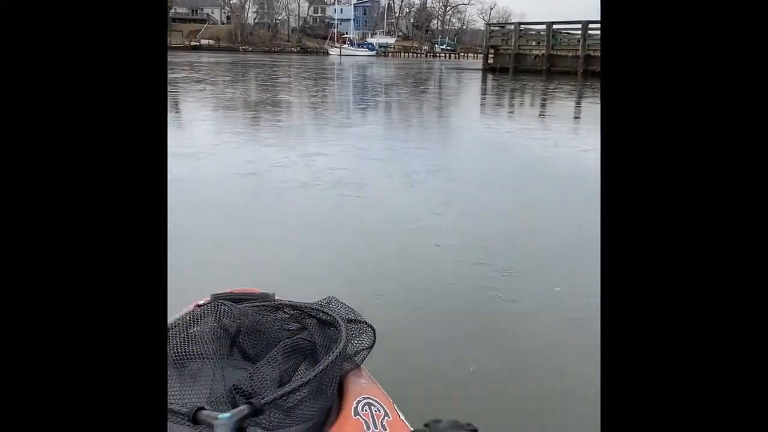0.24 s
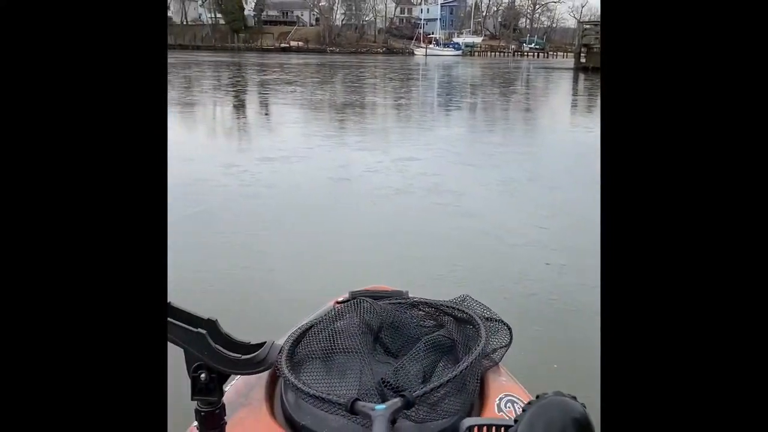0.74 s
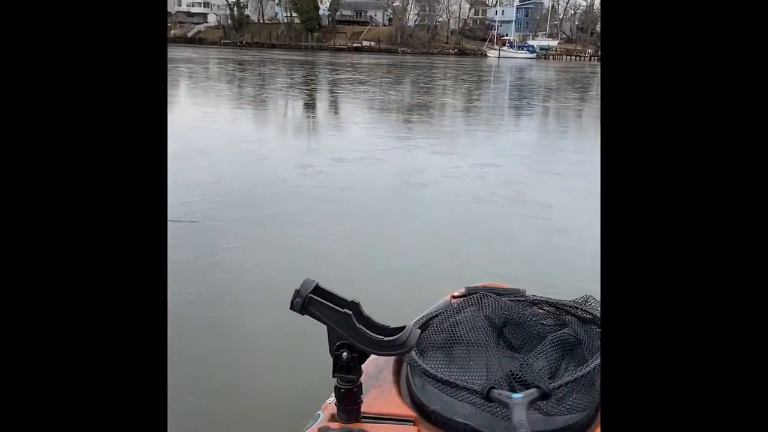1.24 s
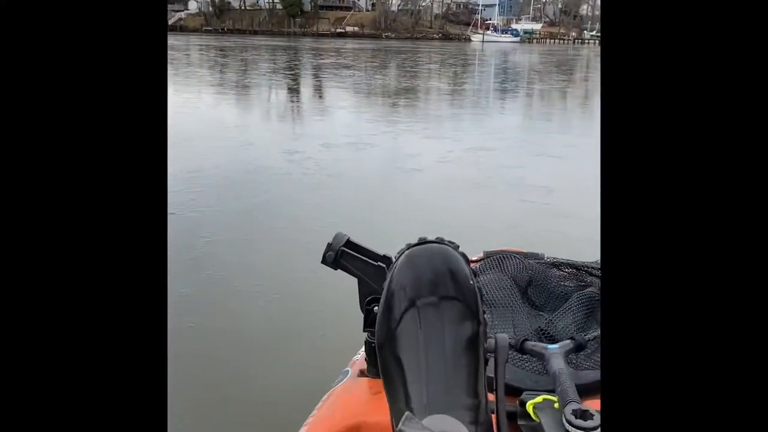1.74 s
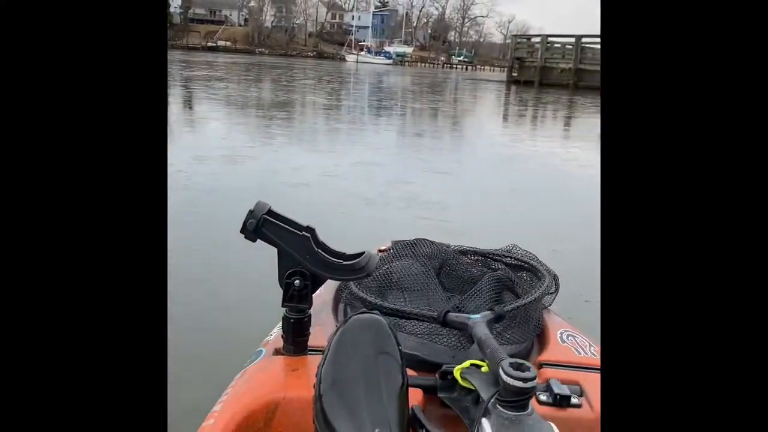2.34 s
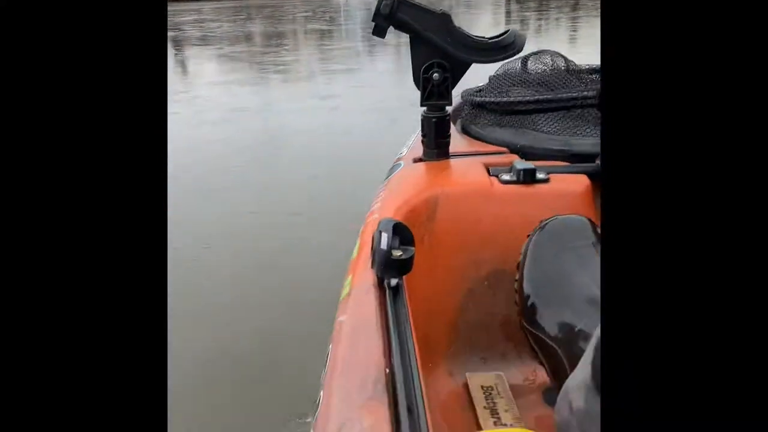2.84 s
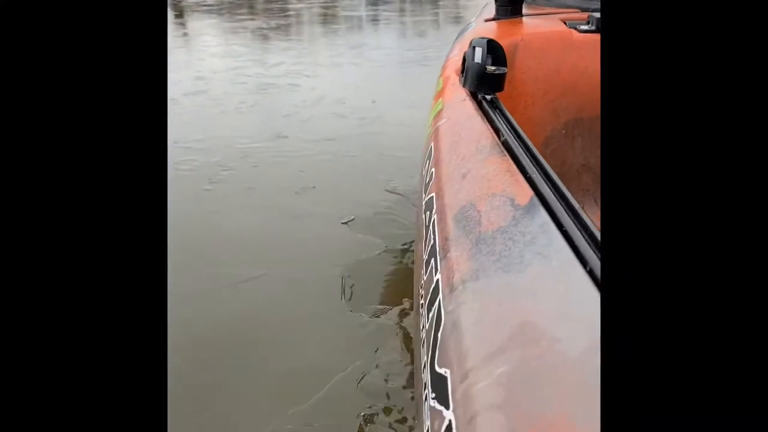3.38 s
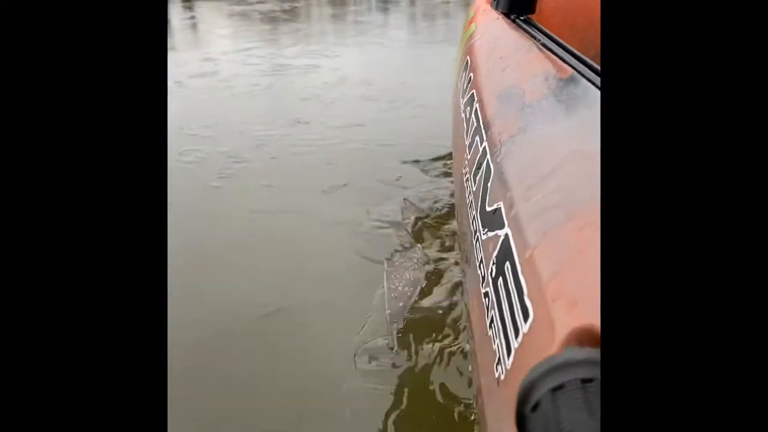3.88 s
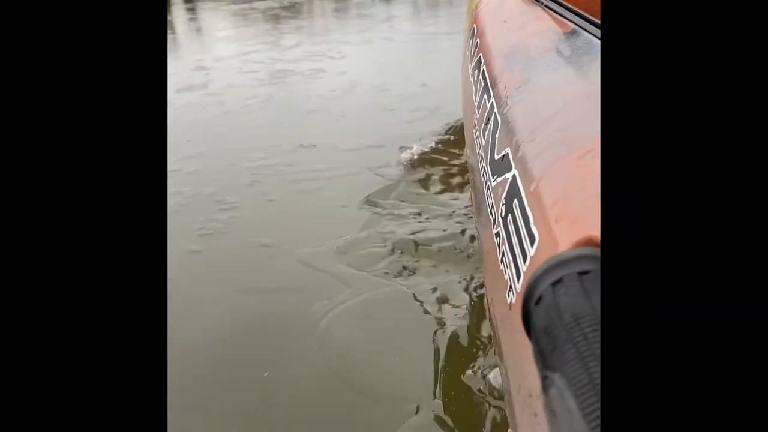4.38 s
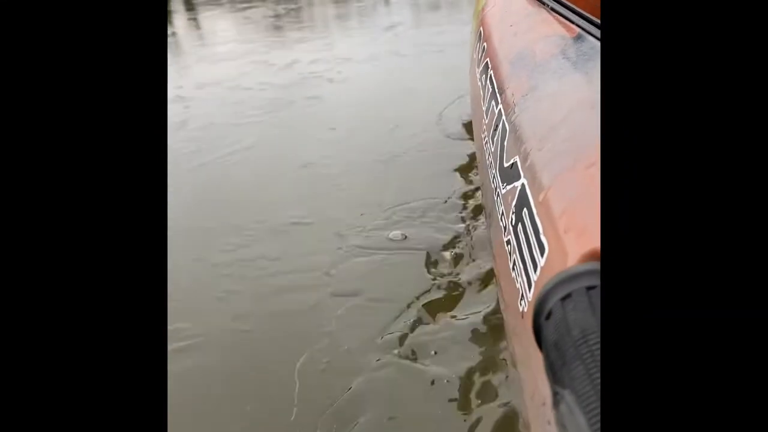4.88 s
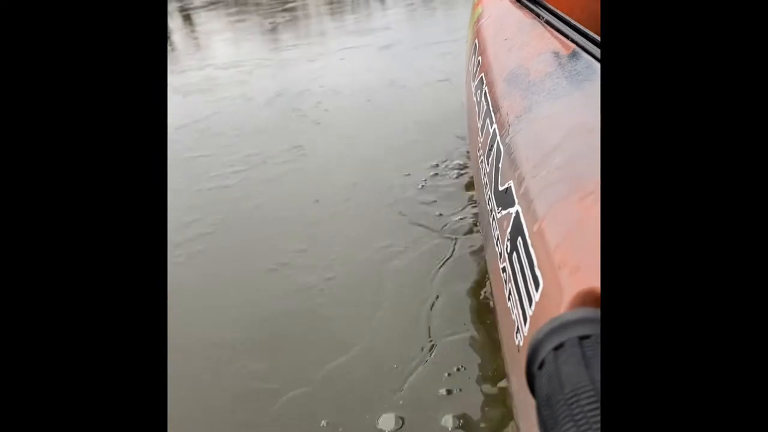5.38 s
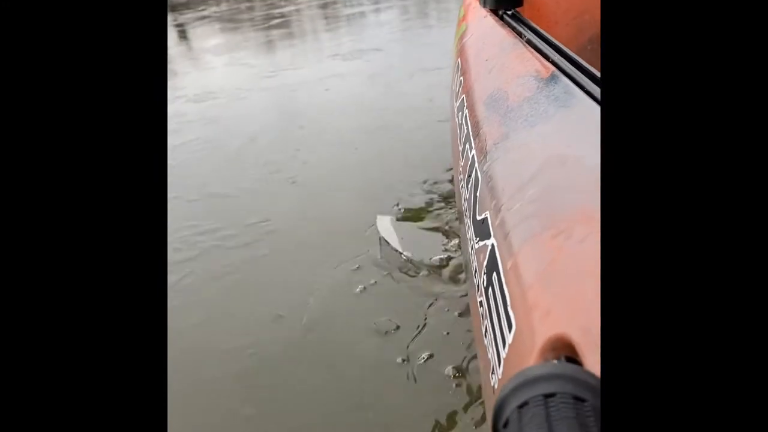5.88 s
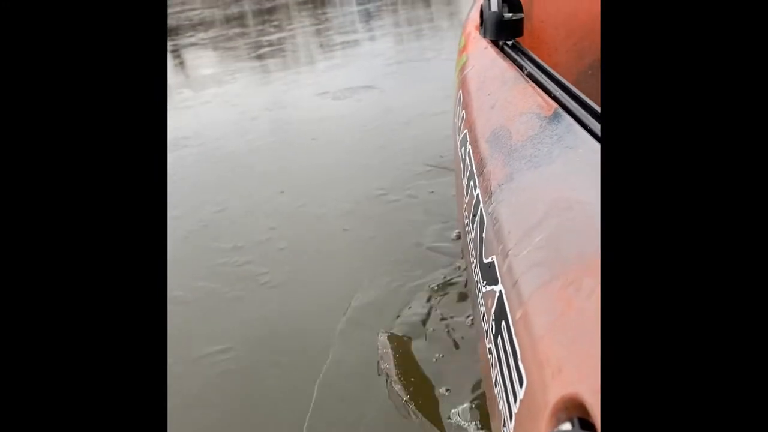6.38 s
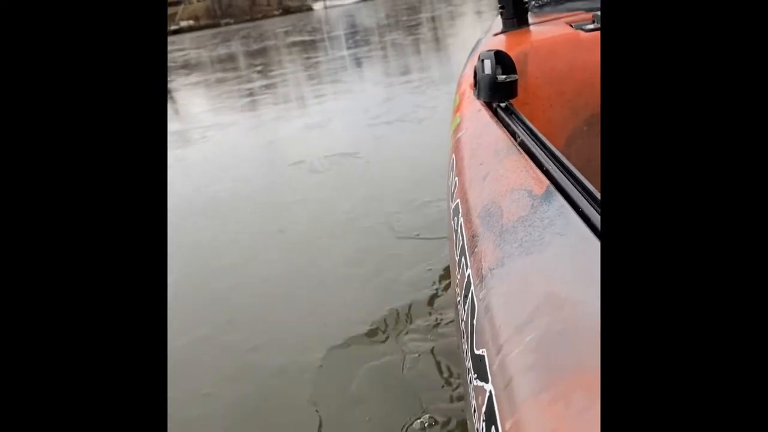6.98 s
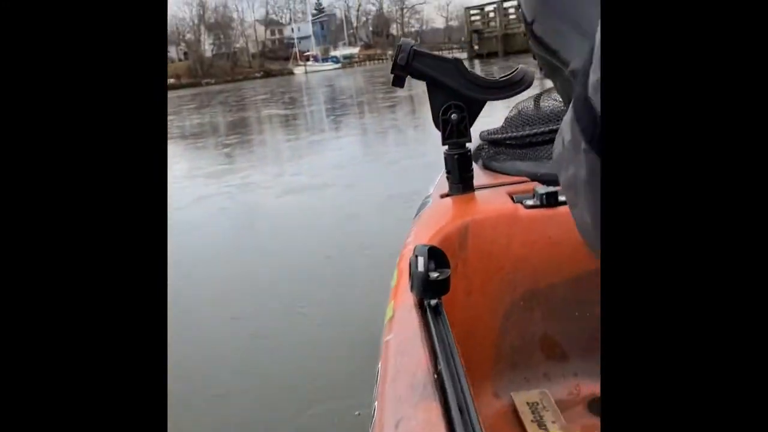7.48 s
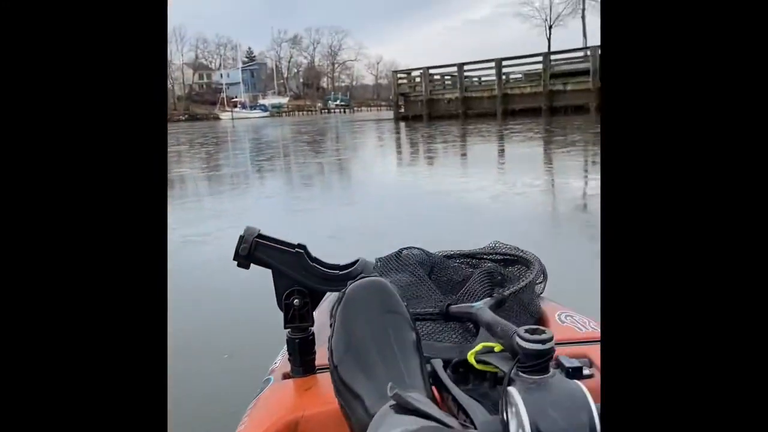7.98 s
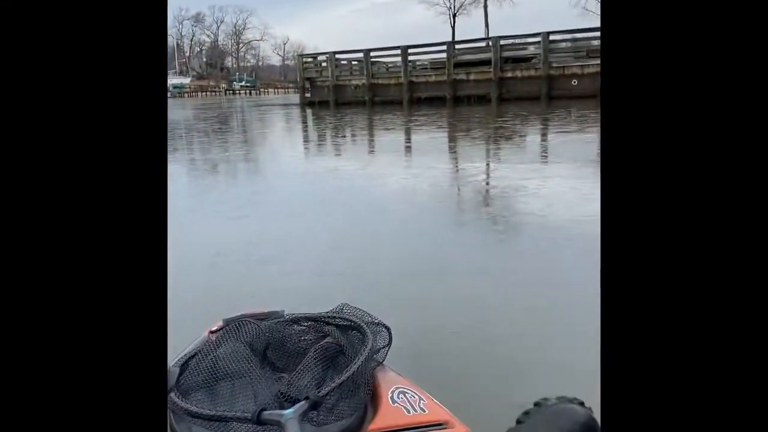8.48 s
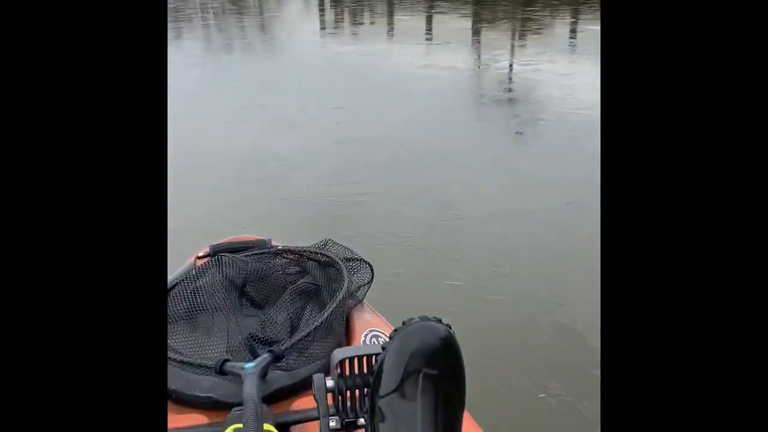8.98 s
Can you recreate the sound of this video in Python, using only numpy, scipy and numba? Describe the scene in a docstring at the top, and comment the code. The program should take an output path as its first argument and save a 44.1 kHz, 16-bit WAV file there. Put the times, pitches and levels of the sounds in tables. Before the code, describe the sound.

Thin river ice cracks and crunches against a hollow plastic kayak hull, with low knocks, grinding drag and brittle glassy snaps, close up outdoors.

```python
"""A plastic kayak is pedalled through new ice on a calm river, heard from a phone held in the seat.
From the start plates crack at the bow, knock on the hollow hull and grind in fits over a steady drag.
From about 2.2 s glassy shard snaps join in, crowding near 3.5 s and again from 4.9 to 5.9 s.
The drag dips near 7.7 s as the boat almost stalls; then cracks crowd in again, with few snaps, to the end.
Breaks are rung click swarms; knocks gliding tones; crunch, fizz and hull drone are dense damped grains."""
import sys
import numpy as np
from scipy import signal
from scipy.fft import rfft, irfft
from scipy.io import wavfile
from scipy.ndimage import uniform_filter1d, map_coordinates
from numba import njit

SR = 44100
rng = np.random.default_rng(int(sys.argv[2]) if len(sys.argv) > 2 else 0)


def digitize_waveform(pressure):
    """Quantize a signal to 16-bit integers and store it at the path in sys.argv[1].

    Rows of a 2-D input are taken as channels; values are limited to [-1, 1].
    """
    field = np.atleast_2d(pressure).T
    bounded = np.clip(field, -1, 1)
    quanta = np.round(bounded * 32767).astype(np.int16)
    wavfile.write(sys.argv[1], SR, quanta)


N = 407043  # samples

# Event and effort levels are those before each layer's gain_db; peak_s is the approximate climax.
# plates breaking at the bow: peak_s, level_db, length_s, pitch_hz, shard_re_plate_db, shard_pitch_hz
PLATE_CRACKS = [(0.4405, -21.5, 0.009, 1220, -8, 3120), (0.679, -24.5, 0.011, 1900, 0, 2670),
                (0.7083, -18.5, 0.0033, 1220, -8, 3430), (0.8544, -22, 0.011, 900, -6, 5840),
                (0.8945, -21, 0.0059, 1220, -14, 2020), (0.9819, -23, 0.017, 890, -9, 3700),
                (1.164, -21.5, 0.0037, 1980, -3, 3480), (1.2898, -23, 0.012, 980, -5, 2090),
                (1.3113, -18.5, 0.0033, 1360, -2, 3220), (1.3444, -22.5, 0.0097, 945, -19, 1910),
                (1.4487, -24, 0.013, 1300, -2, 2300), (1.4895, -20.5, 0.012, 1180, -4, 1920),
                (1.5863, -21.5, 0.013, 930, -3, 3270), (1.6526, -17, 0.0022, 2240, -14, 3830),
                (1.742, -19.5, 0.016, 850, -8, 3500), (1.8537, -16.5, 0.019, 1250, -5, 2090),
                (1.944, -21.5, 0.014, 850, -9, 5600), (2.0466, -22.5, 0.013, 1195, -2, 4430),
                (2.2649, -21, 0.0055, 850, -1, 4800), (2.4187, -23.5, 0.014, 1110, -5, 2830),
                (2.5274, -19, 0.019, 1140, -3.5, 3400), (2.648, -14, 0.0012, 830, -18, 3140),
                (2.7234, -25, 0.016, 850, -4, 5530), (2.909, -24, 0.0093, 870, -20, 2300),
                (2.921, -7.5, 0.00167, 1480, -6, 2100), (2.977, -24, 0.0032, 1700, -15, 5500),
                (3.1715, -20.5, 0.018, 834, -16, 2400), (3.2461, -21, 0.013, 1060, -6, 5750),
                (3.3393, -20.5, 0.013, 960, -1, 5400), (3.3687, -15, 0.004, 840, -1, 4250),
                (3.3841, -13.5, 0.0023, 3700, 0.0, 5300), (3.413, -12.5, 0.0022, 1620, 3, 2800),
                (3.467, -21, 0.0076, 900, -7, 5700), (3.5558, -18, 0.0055, 1200, -25, 1910),
                (3.5969, -18, 0.0091, 865, -8, 2510), (3.6898, -18, 0.0025, 860, 0.0, 4800),
                (3.7552, -14.5, 0.0035, 860, -10, 5300), (3.7735, -13.5, 0.0053, 860, -8, 4270),
                (3.8334, -16, 0.0016, 2380, -7, 3140), (3.8493, -20, 0.016, 955, -1, 5700),
                (3.8748, -21, 0.014, 895, -12.0, 3000), (4.126, -25, 0.003, 1090, -13, 2400),
                (4.1825, -18.5, 0.014, 1050, -22, 2550), (4.533, -16, 0.0061, 1084, -4, 2570),
                (4.703, -35, 0.0026, 1000, -4, 2720), (4.9812, -17.5, 0.0042, 1300, -6, 5770),
                (5.057, -12, 0.0026, 835, -1, 3000), (5.0953, -18, 0.0029, 860, 3, 5900),
                (5.1693, -25, 0.01, 860, 6, 4900), (5.2201, -19, 0.0031, 890, -3.0, 4300),
                (5.4462, -18, 0.013, 830, -16, 2560), (5.5635, -18.5, 0.0074, 860, -8, 5770),
                (5.6271, -20.5, 0.015, 840, -16, 4680), (5.819, -23, 0.0032, 840, -4, 5760),
                (5.946, -21.5, 0.005, 1500, -3, 2520), (6.473, -23, 0.0039, 2800, 5, 4830),
                (6.5074, -19.5, 0.0089, 880, -5, 2640), (6.833, -24, 0.012, 1100, -3, 2230),
                (7.3661, -21, 0.0076, 1050, -14, 4300), (7.534, -28, 0.0024, 1520, -14, 4530),
                (7.7494, -19.5, 0.005, 940, -5, 4040), (7.8117, -22, 0.01, 1250, -6, 3570),
                (7.8875, -22, 0.012, 920, -5, 5740), (7.9033, -17.5, 0.0028, 2190, -4, 3030),
                (8.009, -22.5, 0.0079, 1500, 5, 2080), (8.037, -25, 0.0019, 1220, -10, 2200),
                (8.0798, -14.5, 0.0015, 1550, -10, 2080), (8.0928, -22.5, 0.013, 1150, -12.0, 2200),
                (8.2014, -17.5, 0.0073, 970, -20, 2050), (8.243, -20, 0.0024, 1100, -4, 2000),
                (8.2566, -17, 0.008, 860, -12, 2960), (8.3233, -14, 0.0017, 1700, -11, 3760),
                (8.3621, -15, 0.0045, 1030, -16, 1920), (8.4662, -24.5, 0.0051, 1230, 6, 2170),
                (8.484, -27, 0.0023, 1100, -12, 2330), (8.533, -22.5, 0.0097, 1770, -2, 4860),
                (8.6866, -19, 0.013, 960, -5.5, 3720), (8.7379, -19, 0.0062, 1040, -8, 2720),
                (8.7719, -20.5, 0.0081, 1200, -18, 2420), (9.0027, -19.5, 0.012, 1133, -4, 3980),
                (9.133, -14, 0.0065, 1120, -21, 1870)]
# plates and water bumping the hollow hull: peak_s, level_db, length_s, pitch_hz
HULL_KNOCKS = [(0.17, -17.5, 0.009, 464), (0.199, -10, 0.014, 209), (0.304, -10, 0.0069, 345),
               (0.34, -24, 0.006, 656), (0.428, -12, 0.013, 194), (0.603, -11, 0.0072, 187),
               (0.689, -13, 0.0081, 329), (0.824, -13, 0.0049, 470), (0.873, -20, 0.0045, 640),
               (0.877, -9.5, 0.0052, 338), (1.005, -14, 0.0109, 210), (1.207, -17, 0.018, 360),
               (1.221, -19, 0.0025, 610), (1.226, -8.5, 0.0033, 436), (1.314, -12.5, 0.014, 301),
               (1.338, -12, 0.006, 390), (1.424, -12.5, 0.012, 443), (1.449, -13.5, 0.014, 353),
               (1.447, -23, 0.0065, 570), (1.553, -19, 0.01, 459), (1.701, -22, 0.01, 488),
               (1.885, -14, 0.0094, 460), (1.571, -13, 0.0065, 360), (1.581, -11.5, 0.012, 168),
               (1.704, -18, 0.029, 347), (1.731, -21, 0.014, 143), (1.871, -7.5, 0.0037, 328),
               (2.159, -14.5, 0.0066, 357), (2.388, -16, 0.025, 352), (2.479, -14, 0.0093, 266),
               (2.524, -15, 0.0058, 378), (2.617, -13, 0.012, 350), (2.749, -12, 0.011, 210),
               (2.885, -12, 0.0045, 480), (2.924, -25, 0.0046, 560), (3.056, -9.5, 0.0058, 253),
               (3.058, -13.5, 0.016, 144), (3.141, -10, 0.0075, 286), (3.178, -15, 0.012, 430),
               (3.252, -21, 0.0059, 574), (3.348, -12.5, 0.0077, 335), (3.402, -13, 0.016, 91),
               (3.426, -8, 0.0069, 270), (3.431, -14, 0.0083, 510), (3.552, -18, 0.0089, 174),
               (3.593, -16, 0.015, 88), (3.654, -11, 0.0074, 220), (3.784, -15, 0.013, 141),
               (3.787, -20, 0.018, 254), (3.792, -12, 0.006, 710), (3.795, -12, 0.007, 402),
               (3.805, -8, 0.0052, 265), (3.817, -10.5, 0.018, 87), (3.842, -13, 0.0083, 256),
               (3.866, -14, 0.0061, 680), (3.866, -12, 0.0164, 98), (3.884, -19, 0.0129, 338),
               (4.178, -14, 0.016, 166), (4.276, -11.5, 0.0058, 274), (4.429, -9.5, 0.0067, 280),
               (4.535, -9.5, 0.0072, 233), (4.561, -16.5, 0.0053, 343), (4.622, -24, 0.0079, 632),
               (4.706, -14, 0.0032, 600), (4.709, -12, 0.0061, 283), (4.749, -14.5, 0.017, 289),
               (4.792, -8, 0.0074, 173), (5.056, -15, 0.0042, 637), (5.063, -17, 0.015, 310),
               (5.115, -11.5, 0.013, 103), (5.135, -18, 0.0086, 176), (5.224, -17, 0.0095, 296),
               (5.476, -12, 0.0065, 294), (5.586, -14.5, 0.032, 98), (5.636, -12.5, 0.015, 174),
               (5.795, -11.5, 0.0053, 250), (5.953, -20.5, 0.018, 88), (5.965, -13.5, 0.018, 341),
               (5.995, -17.5, 0.008, 743), (6.096, -13.5, 0.0069, 281), (6.15, -13, 0.01, 180),
               (6.358, -11.5, 0.013, 156), (6.392, -13.5, 0.025, 174), (6.454, -17, 0.0086, 402),
               (6.51, -16, 0.007, 560), (6.608, -15, 0.025, 222), (6.735, -17.5, 0.0058, 350),
               (6.832, -15, 0.0064, 440), (6.918, -9, 0.0073, 181), (7.157, -20, 0.025, 280),
               (7.172, -21, 0.0062, 580), (7.175, -17, 0.0093, 186), (7.211, -13.5, 0.009, 190),
               (7.214, -9, 0.0054, 340), (7.35, -17, 0.0085, 345), (7.364, -13, 0.011, 170),
               (7.596, -17, 0.0096, 242), (7.84, -12.5, 0.0077, 206), (7.895, -19, 0.007, 650),
               (7.924, -14, 0.018, 327), (8.099, -11, 0.0042, 454), (8.216, -18.5, 0.0065, 527),
               (8.499, -23, 0.0069, 700), (8.359, -15, 0.014, 200), (8.69, -14.5, 0.006, 723),
               (8.699, -13, 0.0057, 294), (8.764, -15, 0.012, 196), (9.0, -17.5, 0.015, 293),
               (9.148, -15, 0.011, 212)]
# brittle snaps of thin shards: peak_s, level_db, pitch_hz
SHARD_SNAPS = [(0.134, -20.5, 12100), (0.832, -21, 10600), (1.941, -22, 8040), (2.04, -23, 9290),
               (2.263, -14, 9700), (2.35, -19, 6650), (2.584, -16.5, 12800), (2.719, -14, 10600),
               (2.919, -11.5, 11500), (2.976, -21, 7850), (3.003, -16.5, 8600), (3.245, -18.5, 7840),
               (3.283, -16.5, 8750), (3.381, -13.5, 8800), (3.441, -16, 13400), (3.466, -10, 9000),
               (3.528, -18, 8200), (3.609, -23, 9700), (3.664, -15, 8340), (3.689, -14, 11700),
               (3.788, -13.5, 9100), (3.808, -21, 11900), (3.85, -14.5, 10000), (4.079, -22, 9700),
               (4.322, -23, 8800), (4.944, -13.5, 9000), (4.972, -20, 10300), (4.977, -13.5, 9200),
               (4.995, -21, 7650), (5.055, -21, 7140), (5.095, -10.5, 8950), (5.138, -18.5, 11400),
               (5.217, -18, 12310), (5.561, -5, 11700), (5.651, -18, 10600), (5.662, -16, 12800),
               (5.719, -20.5, 8300), (5.727, -18, 11000), (5.766, -23, 9100), (5.818, -9, 10800),
               (5.867, -20, 11200), (6.154, -24, 12300), (6.48, -14, 10400), (6.587, -22.5, 9800),
               (6.9, -22, 12700), (7.115, -20, 8500), (7.359, -16.5, 9750), (7.533, -18.5, 12200),
               (8.696, -21, 11700)]
# broken edges scraping over the sheet: peak_s, level_db, length_s, pitch_hz
EDGE_SCRAPES = [(0.463, -33, .02, 1120), (0.654, -37.5, 0.0081, 3620), (1.278, -36, 0.01, 3040),
                (1.335, -29, .016, 1550), (1.479, -33, 0.013, 3730), (2.824, -32, 0.015, 2410),
                (2.86, -33, .014, 4360), (3.047, -21.5, .01, 1190), (3.191, -37, 0.016, 2930),
                (3.306, -21, 0.0062, 1200), (3.839, -28.5, .022, 3400), (4.525, -24, .01, 2600),
                (4.726, -33, 0.024, 3300), (4.761, -34, .05, 895), (5.44, -33, 0.016, 2560),
                (5.982, -35, 0.047, 1000), (6.507, -31.5, 0.01, 2920), (8.343, -30, 0.03, 1750),
                (8.465, -27, .008, 2100), (8.522, -25, 0.0067, 2100)]
# modes of a loose ice plate: pitch_ratio, level_db
PLATE_MODES = [(.78, -10.5), (1, 3.5), (1.36, 0), (1.9, -8.5)]
# colour of crushed ice: freq_hz, gain_db
CRUNCH_COLOUR = [(200, -34), (400, -2.5), (600, -1.5), (1000, -0.5), (1400, -4), (1800, -8), (2600, -7.5),
                 (4500, -12.5), (8000, -11.5), (16000, -106)]
# colour of sliding splinters: freq_hz, gain_db
SPLINTER_COLOUR = [(1500, -25), (3500, -8), (6000, -3), (8300, 3.5), (10500, -6), (12800, 6.5), (16000, -2)]
# hull resonances: freq_hz, width_hz, level_db
HULL_MODES = [(87.8, 53, -1.5), (144, 42, -0.5), (177.7, 40, 0), (224.3, 45, -1.5), (288.3, 50, -2),
              (351.8, 36.4, -2.5), (477, 127, -5)]
# hull wall boom, fullest while the phone leans out over the side: time_s, lowest_mode_lift_db
LEAN_LIFT = [(0, 2), (1.3, -5), (2.1, 2), (3.7, 0), (4.3, 1), (6.7, 3), (7.7, -2)]
# fits in which the sheet gives way: start_s, length_s, hull_level_db, crumbs_level_db, splinters_level_db
SHEET_SHOVES = [(-0.004, 0.097, -30.5, -40, -39), (0.176, 0.053, -30.5, -37, -44),
                (0.284, 0.086, -26, -30.5, -47.5), (0.375, 0.149, -26.5, -30.5, -50),
                (0.611, 0.041, -28.5, -30, -40.5), (0.69, 0.05, -19.5, -30.5, -45.5),
                (0.775, 0.02, -26, -34, -44), (0.81, 0.107, -24, -29.5, -44),
                (0.938, 0.086, -20.5, -35, -48), (1.157, 0.087, -23, -29, -47.5),
                (1.273, 0.091, -17.5, -30, -50.5), (1.423, 0.077, -20.5, -24.5, -49.5),
                (1.545, 0.079, -20, -31, -52), (1.673, 0.074, -18.5, -29, -44.5),
                (1.809, 0.131, -23.5, -33, -49), (1.962, 0.105, -23.5, -30.5, -43),
                (2.124, 0.041, -19.5, -35.5, -47.5), (2.198, 0.12, -22, -30.5, -39),
                (2.32, 0.142, -20, -32.5, -40), (2.484, 0.04, -19, -28, -40.5),
                (2.572, 0.094, -21.5, -26, -44.5), (2.698, 0.076, -20, -24.5, -45.5),
                (2.771, 0.069, -21.5, -33, -43), (2.847, 0.066, -23.5, -25.5, -46),
                (2.991, 0.059, -20, -23.5, -44), (3.101, 0.099, -18.5, -24, -48.5),
                (3.224, 0.092, -24.5, -27.5, -39), (3.312, 0.187, -20.5, -26, -38.5),
                (3.498, 0.079, -15, -35.5, -45.5), (3.651, 0.038, -29, -28.5, -41),
                (3.715, 0.17, -17.5, -25, -44), (4.006, 0.038, -27, -30.5, -30),
                (4.107, 0.087, -19, -25.5, -46), (4.219, 0.134, -24, -31.5, -51),
                (4.396, 0.088, -24.5, -31, -47), (4.47, 0.107, -20.5, -34, -48.5),
                (4.601, 0.083, -25.5, -27, -46.5), (4.689, 0.114, -19.5, -24.5, -44),
                (4.864, 0.026, -28, -25, -44.5), (4.973, 0.183, -23, -29.5, -41.5),
                (5.157, 0.08, -25.5, -27.5, -37.5), (5.3, 0.036, -24, -30, -44),
                (5.421, 0.111, -24, -28.5, -49), (5.55, 0.155, -24, -28, -44),
                (5.732, 0.176, -25, -32.5, -34.5), (5.949, 0.106, -25, -27.5, -48.5),
                (6.07, 0.183, -23.5, -28, -52.5), (6.327, 0.124, -22, -31.5, -37),
                (6.461, 0.095, -20.5, -27.5, -43.5), (6.575, 0.078, -21.5, -28.5, -47.5),
                (6.692, 0.17, -22, -30, -47.5), (6.871, 0.038, -22.5, -27, -45),
                (7.081, 0.091, -23.5, -30, -47), (7.183, 0.055, -18.5, -41, -54),
                (7.316, 0.178, -22.5, -32, -47.5), (7.533, 0.063, -19.5, -26, -43),
                (7.797, 0.015, -21, -28.5, -37), (7.852, 0.09, -18, -27.5, -45.5),
                (8.025, 0.082, -20, -26, -44), (8.176, 0.12, -20, -32.5, -51.5),
                (8.293, 0.108, -20.5, -27, -50.5), (8.454, 0.099, -21.5, -31, -49),
                (8.677, 0.112, -22, -36, -49.5), (8.797, 0.111, -24, -32.5, -49),
                (8.972, 0.079, -25, -31.5, -44), (9.074, 0.156, -24.5, -33, -45.5)]
# steady drag of the ice edge, low where the boat almost stalls: time_s, level_db
EDGE_DRAG = [(0.0, -26), (1.1, -27.5), (2.2, -29.0), (3.4, -23.5), (3.95, -23.5), (4.9, -24.5), (5.8, -27),
             (6.3, -28), (7.55, -24.5), (7.68, -31.5), (7.9, -26), (9.23, -28.5)]
# microphone ports, phase: freq_hz, left_lead_rad
PORT_LEAD = [(340, 0), (860, .5), (1550, .1), (2500, .7), (4800, 1.6), (6500, 1.9), (8200, 2.9),
             (11300, 3.35), (13500, 4.3), (15500, 4.9)]
# microphone ports, balance: freq_hz, left_minus_right_db
PORT_LEVEL = [(60, -1), (110, -1.6), (200, -3.7), (380, -5.3), (620, -6), (1290, -1), (2400, -1), (8000, 0)]
# scattered share at the ports, before echo_db: freq_hz, scattered_re_direct_db
PORT_SCATTER = [(60, -25), (150, -19), (300, -12), (600, -1), (1200, -8), (2500, -5), (5000, -2),
                (8500, -12), (11000, -13), (14000, 0)]

# fracture: swarm rate, grit between clicks, main break
CLICKS_PER_S, GRIT_DB, BREAK_DB = 3500, -15, 4
PLATE_SPREAD_OCTAVES = 0.1  # no two plates have the same shape
# ring of a shard; level and relative width of its dry edge
SHARD_Q, SHARD_EDGE_DB, SHARD_EDGE_WIDTH_RATIO = 16, 4, 1
# small chips: length, shard level and shard pitch relative to the chip
CHIP_S, CHIP_SHARD_DB, CHIP_SHARD_RATIO = .003, -3, 2.3
THUD_LAG_S = 0.00304  # the freed plate hits the water just after the crack
# 1 kHz bending wave: mean time across the ice, time along the hull
ICE_TRAVEL_MEAN_S, HULL_TRAVEL_S = .003, .006
SOFT_KNOCK_S = 0.01028
# pitch bend by the water; hard first contact relative to the knock's body
GURGLE_SHARE, CONTACT_DB = .12, -14
SNAP_S = 0.0029
SCRAPE_Q, SCRAPE_SLIPS_PER_S, SCRAPE_SAG_OCTAVES = 6, 1500, .1
CLUMPS_PER_S, CLUMP_RMS_DB = 35, 2.0  # crumbs of one size break together
HULL_DRIFT_SHARE, HULL_DRIFT_PER_S = 0.0407, 4
HULL_ATTACK_S, HULL_RELEASE_S = .025, 0.043  # the shell takes up the load and rings out
ICE_ATTACK_S, ICE_RELEASE_S = .009, .012
CRUMBS_RE_DRAG_DB, SPLINTERS_RE_DRAG_DB = -7, -23.5
TOP_HZ = 15850


def cracks(crush_db, gain_db=-3.0, lead=.7, thud_db=-10, thud_ratio=0.45):
    """Plates and small chips crack with a dispersed chirp; the larger the plate, the deeper its thud."""
    out = np.zeros(N)
    small = lesser(crush_db, above_db=0.5, spread_db=1, hz=1540, octaves=0.81, count=110)
    chips = [(s, db, CHIP_S, hz, CHIP_SHARD_DB, CHIP_SHARD_RATIO * hz) for s, db, hz in small]
    for peak_s, db, length_s, hz, shard_db, shard_hz in list(PLATE_CRACKS) + chips:
        crack = fracture(length_s, hz, shard_db, shard_hz, plate_q=11, breadth=.85)
        travel_s = ICE_TRAVEL_MEAN_S * (.5 + rng.random())  # near or far
        crack, late_s = bend(crack, travel_s, np.sqrt(hz * shard_hz))
        start_s = peak_s - lead * length_s - late_s
        add(out, crack, start_s, db + gain_db, length_s)
        thud_hz = thud_ratio * hz
        thud = ring(ring(crack, thud_hz, thud_hz / 2), thud_hz, thud_hz / 3)
        add(out, thud, start_s + THUD_LAG_S, db + thud_db, length_s)
    return out


def fracture(length_s, hz, shard_db, shard_hz, plate_q, breadth, size=3072):
    """A main break in a swelling, fading click swarm rings the freed plate and a split-off shard."""
    age = np.arange(size) / SR / max(length_s, .0005)
    swell = age ** 2 * np.exp(-np.pi * age)
    swarm = (rng.random(size) < CLICKS_PER_S / SR) + amp(GRIT_DB)
    clicks = swarm * rng.standard_normal(size) * swell / swell.max()
    clicks[np.argmax(swell)] += amp(BREAK_DB)

    body = ring(ring(clicks, hz, hz * breadth), hz, 2 * hz * breadth)
    spread = 2 ** (PLATE_SPREAD_OCTAVES * rng.standard_normal(len(PLATE_MODES)))
    mode_hz = hz * np.array(PLATE_MODES)[:, 0] * spread
    plate = sum(amp(db) * unit(ring(clicks, f, f / plate_q)) for f, (_, db) in zip(mode_hz, PLATE_MODES))

    shard_tone = unit(ring(clicks, shard_hz, shard_hz / SHARD_Q))
    shard_edge = unit(ring(clicks, shard_hz, SHARD_EDGE_WIDTH_RATIO * shard_hz))
    shard = shard_tone + amp(SHARD_EDGE_DB) * shard_edge
    return unit(unit(body) + unit(plate)) + amp(shard_db) * unit(shard)


def knocks(push_db, gain_db=-2.5, lead=.7, rattle_db=-14, size=4096):
    """Bumps cluck downward through the hull; water bends their pitch; soft ones follow the push."""
    out, t = np.zeros(N), np.arange(size) / SR
    lesser_knocks = lesser(push_db, above_db=-3.5, spread_db=2, hz=260, octaves=0.9, count=30)
    soft = [(s, db, SOFT_KNOCK_S, hz) for s, db, hz in lesser_knocks]
    for peak_s, db, length_s, hz in list(HULL_KNOCKS) + soft:
        age = t / (length_s * 0.5)
        glide = GURGLE_SHARE * rng.uniform(-1.06, 1)
        pitch_hz = hz * (1 + glide * np.tanh(age / 2 - .7))
        tone = np.sin(2 * np.pi * np.cumsum(pitch_hz) / SR)
        rattle = ring(ring(rng.standard_normal(size), 1.54 * hz, 2 * hz), 1.54 * hz, 2 * hz)
        body = (unit(tone) + amp(rattle_db) * unit(rattle)) * age * np.exp(-age)
        click = 1. * (t == t[np.argmax(age > .5)])
        contact = ring(ring(click, 2 * hz, hz), 2 * hz, 2 * hz)
        knock, late_s = bend(unit(body) + amp(CONTACT_DB) * unit(contact), HULL_TRAVEL_S, hz)
        add(out, knock, peak_s - lead * length_s - late_s, db + gain_db, length_s)
    return out


def snaps(slide_db, gain_db=1.0, lead=0.6, top_hz=13500):
    """Thin shards fracture, short and glassy; many tiny ones go off among the splinters."""
    out = np.zeros(N)
    tiny = lesser(np.minimum(slide_db, -38), above_db=19.5, spread_db=2.0, hz=10340, octaves=0.39, count=36)
    for peak_s, db, hz in list(SHARD_SNAPS) + tiny:
        snap = fracture(SNAP_S, hz, shard_db=-8, shard_hz=hz / 2, plate_q=24, breadth=.55)
        add(out, snap, peak_s - lead * SNAP_S, db + gain_db, SNAP_S)
    # even the quickest break takes time, which rounds off the very top
    return signal.sosfilt(signal.butter(2, top_hz, fs=SR, output="sos"), out)


def scrapes(gain_db=0.0, overtone_db=-12, overtone_ratio=1.37, size=6144):
    """An edge slips in a short clump; each slip rings the piece, lower as more of it comes free."""
    out = np.zeros(N)
    for peak_s, db, length_s, hz in EDGE_SCRAPES:
        age = np.arange(size) / SR / length_s
        slips = (rng.random(size) < SCRAPE_SLIPS_PER_S / SR) + amp(2 * GRIT_DB)
        slips = slips * rng.standard_normal(size) * age ** 2 * np.exp(-np.pi * age)
        piece, overtone = (unit(ring(ring(slips, f, f / SCRAPE_Q), f, f / 2))
                           for f in (hz, overtone_ratio * hz))
        # read ever more slowly, so the pitch sags
        place = np.cumsum(2 ** (-SCRAPE_SAG_OCTAVES * np.tanh(age - 2 / np.pi)))
        sound = map_coordinates(piece + amp(overtone_db) * overtone, [place])
        add(out, sound, peak_s - length_s * 2 / np.pi, db + gain_db, length_s)
    return out


def crunch(crush_db, gain_db=0.0):
    """Crumbs are crushed in fits and starts; small bubbles pop and loose flakes clatter among them."""
    crumbs = grains(per_s=2200, low_hz=300, high_hz=9000, cycles=1.2, spread_db=3)
    crumbs = crumbs * stutter(per_s=110, depth_db=2.0)
    bands_hz = 400 * 2 ** np.arange(0, 4.6, .75)
    crumbs = sum(ring(crumbs, hz, hz / 2) * amp(CLUMP_RMS_DB * walk(CLUMPS_PER_S)) for hz in bands_hz)
    bubbles = grains(per_s=200, low_hz=400, high_hz=2500, cycles=4, spread_db=3)
    flakes = grains(per_s=160, low_hz=1800, high_hz=4800, cycles=8, spread_db=3)
    mix = unit(crumbs) + amp(-9.5) * bubbles + amp(-10) * flakes
    return unit(shaped(mix, amp(on_bins(CRUNCH_COLOUR)))) * amp(crush_db + gain_db)


def splinters(slide_db, gain_db=2.0):
    """Fine splinters stick and slip over the sheet: a prickly fizz of high grains."""
    fizz = grains(per_s=5000, low_hz=2500, high_hz=16000, cycles=2.5, spread_db=4)
    fizz = fizz * stutter(per_s=130, depth_db=2.2)
    return unit(shaped(fizz, amp(on_bins(SPLINTER_COLOUR)))) * amp(slide_db + gain_db)


def hull(push_db, lean_db, gain_db=-0.05, cut_hz=55):
    """The ice edge judders along the shell; separate grains strike each mode and the pitch drifts."""
    modes = []
    for hz, width_hz, db in HULL_MODES:
        judder = grains(per_s=400, low_hz=hz / 2, high_hz=hz * 2, cycles=0.58, spread_db=1.5)
        modes.append(amp(db) * unit(ring(judder, hz, width_hz)))
    drum = waver(modes[0] * amp(lean_db) + sum(modes[1:]), HULL_DRIFT_SHARE, HULL_DRIFT_PER_S)
    drum = signal.sosfilt(signal.butter(3, cut_hz, "high", fs=SR, output="sos"), drum)
    return unit(drum) * amp(push_db + gain_db)


def effort(column, drag_db, attack_s, release_s):
    """Level in dB of one layer: shoves rise, hold and die away, adding in power to the steady drag."""
    t = np.arange(0, N, 32) / SR
    power = amp(np.interp(t, *np.transpose(EDGE_DRAG)) + drag_db) ** 2
    for start_s, length_s, *levels_db in SHEET_SHOVES:
        age_s = t - start_s
        fade = np.exp(-np.clip((age_s - length_s) / release_s, 0, 20))
        shape = np.clip(age_s / attack_s, 0, 1) * fade
        power = power + (amp(levels_db[column]) * shape) ** 2
    return np.interp(np.arange(N) / SR, t, 10 * np.log10(power))


def lesser(level_db, above_db, spread_db, hz, octaves, count):
    """Chance events, likelier and louder where the level is high: peak_s, level_db, pitch_hz."""
    when, size, pitch = rng.random((count, 3)).T
    odds = np.cumsum(amp(level_db / 2))
    at = np.searchsorted(odds, (np.arange(count) + when) / count * odds[-1]).clip(0, N - 1)
    event_db = level_db[at] + above_db + abs(spread_db) * (2 * size - 1)
    return list(zip(at / SR, event_db, hz * 2 ** (octaves * (2 * pitch - 1))))


def grains(per_s, low_hz, high_hz, cycles, spread_db):
    """Many small fractures, of every pitch between two limits; few are large."""
    when, pitch, damping, size = rng.random((int(per_s * N / SR), 4)).T
    size_db = spread_db * np.minimum(-np.log(1 - size), 4)
    hz = low_hz * (high_hz / low_hz) ** pitch
    return unit(ping(when * N, hz, cycles * 2 ** (2 * damping - 1), amp(size_db)))


@njit
def ping(start, hz, cycles, size):
    """Sum of tiny damped rings, each dying by 1 / e in its number of cycles."""
    out = np.zeros(N)
    for k in range(len(start)):
        life = cycles[k] * SR / hz[k]  # samples
        pole = np.exp(2j * np.pi * hz[k] / SR - 1 / life)
        z = size[k] / np.sqrt(life) + 0j
        for i in range(int(start[k]), min(N, int(start[k] + 6 * life))):
            out[i] += z.imag
            z *= pole
    return out


def stutter(per_s, depth_db):
    """Stick and slip: a gain that jumps to a new random level many times a second."""
    step = np.cumsum(rng.random(N) < per_s / SR)
    level = uniform_filter1d(rng.standard_normal(N)[step], size=60)
    return unit(amp(depth_db * level))


def walk(per_s):
    """A smooth random drift of rms 1."""
    step = int(SR / per_s)
    drift = np.repeat(rng.standard_normal(N // step + 1), step)
    drift = uniform_filter1d(uniform_filter1d(drift, step), step)
    return unit(drift[:N])


def waver(x, share, per_s):
    """A drifting delay moves the pitch up and down by a small share."""
    late = share * SR / (np.pi * per_s) * walk(per_s)  # samples
    return map_coordinates(x, [np.arange(N) - late], order=1, mode="mirror")


def bend(x, travel_s, hz):
    """Higher bending waves run faster: a click becomes a falling chirp; also gives the delay at hz."""
    size = 2 * len(x)
    khz = np.arange(size // 2 + 1) * SR / size / 1000
    turns = 2 * travel_s * 1000 * np.sqrt(khz)
    chirp = irfft(rfft(x, size) * np.exp(-2j * np.pi * turns))
    return chirp, travel_s * np.sqrt(1000 / hz)


def ring(x, hz, width_hz):
    """A resonance with gain 1 at its centre."""
    hz = min(hz, .45 * SR)
    return signal.lfilter(*signal.iirpeak(hz, hz / min(width_hz, SR / 4), fs=SR), x)


def on_bins(points):
    """Join (freq_hz, value) points on a log axis, one value for each frequency bin."""
    hz, value = np.transpose(points)
    return np.interp(np.log(np.arange(N // 2 + 1) * SR / N + 1), np.log(hz), value)


def shaped(x, gain, order=2048):
    """Filter by a complex gain for each frequency bin."""
    taps = np.roll(irfft(gain), order // 2)[:order] * np.hanning(order)
    return signal.oaconvolve(x, taps)[order // 2:order // 2 + N]


def add(track, sound, start_s, db, length_s):
    """Mix in a sound that carries the energy of level db held for length_s."""
    sound = sound * amp(db) * np.sqrt(length_s * SR / (np.sum(sound ** 2) + 1e-18))
    at = int(start_s * SR) + np.arange(len(sound))
    inside = (at >= 0) & (at < N)
    track[at[inside]] += sound[inside]


def amp(db):
    """Decibels to gain."""
    return 10 ** (np.asarray(db) / 20)


def unit(x):
    """Scale to rms 1."""
    return x / np.sqrt(np.mean(x ** 2) + 1e-18)


def ports(x, echo_db, scatter_s=0.0083, wander_per_s=35, size=1500, count=5):
    """Two ports differ in phase and level; short echoes off deck and ice drift as the break moves."""
    lead_rad, balance_db = on_bins(PORT_LEAD), on_bins(PORT_LEVEL)
    share = amp(on_bins(PORT_SCATTER) + echo_db)
    out = []
    for sign in (1, -1):  # left, right
        tails = rng.standard_normal((count, size)) * np.exp(-np.arange(size) / SR / scatter_s)
        scattered = sum(signal.oaconvolve(x * walk(wander_per_s), tail)[:N] for tail in tails)
        scattered = scattered / np.linalg.norm(tails)
        gain = amp(sign * balance_db / 2) / np.sqrt(1 + share ** 2)
        direct = shaped(x, gain * np.exp(.5j * sign * lead_rad))
        out.append(direct + shaped(scattered, gain * share))
    return np.array(out)


def scene():
    """Breaking ice arrives almost straight; the grinding all round the bow comes with more echo."""
    push_db = effort(0, 0, HULL_ATTACK_S, HULL_RELEASE_S)
    crush_db = effort(1, CRUMBS_RE_DRAG_DB, ICE_ATTACK_S, ICE_RELEASE_S)
    slide_db = effort(2, SPLINTERS_RE_DRAG_DB, ICE_ATTACK_S, ICE_RELEASE_S)
    lean_db = np.interp(np.arange(N) / SR, *np.transpose(LEAN_LIFT))
    breaking = cracks(crush_db) + snaps(slide_db) + scrapes() + splinters(slide_db)
    grinding = knocks(push_db) + crunch(crush_db) + hull(push_db, lean_db)
    return ports(breaking, echo_db=-5.5) + ports(grinding, echo_db=3.0)


def record(dry):
    """The phone drops the deepest bass, clips the peaks below full scale and cuts the top."""
    thinned = signal.sosfilt(signal.butter(2, 35, "high", fs=SR, output="sos"), dry)
    clipped = np.clip(thinned, -.75, .75)
    return signal.sosfilt(signal.ellip(8, .2, 70, TOP_HZ, fs=SR, output="sos"), clipped)


dry = scene()
out = record(dry)
digitize_waveform(out)
```